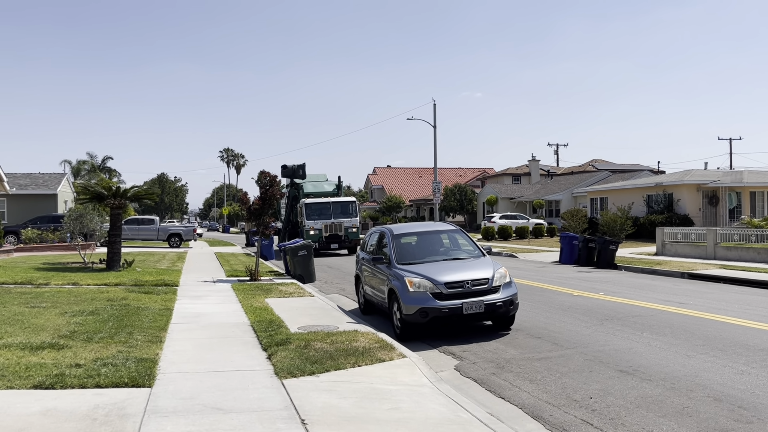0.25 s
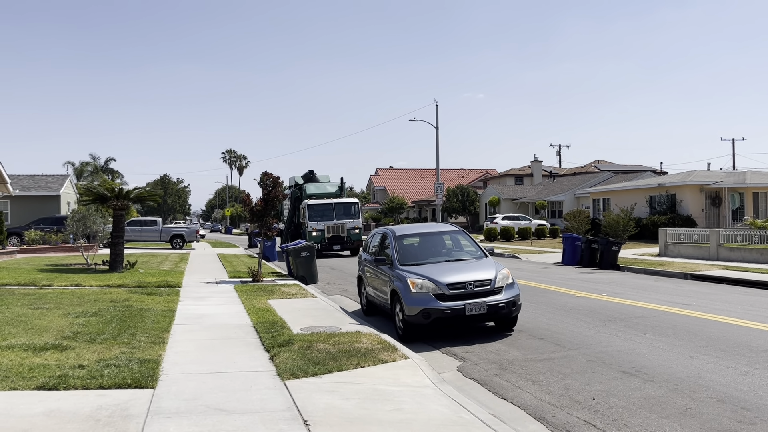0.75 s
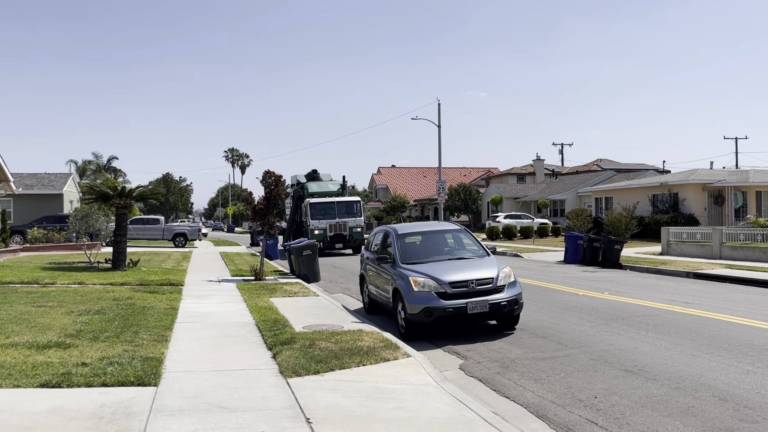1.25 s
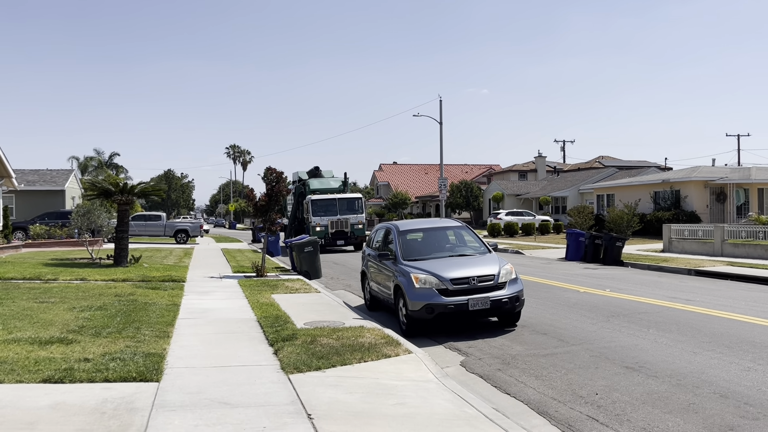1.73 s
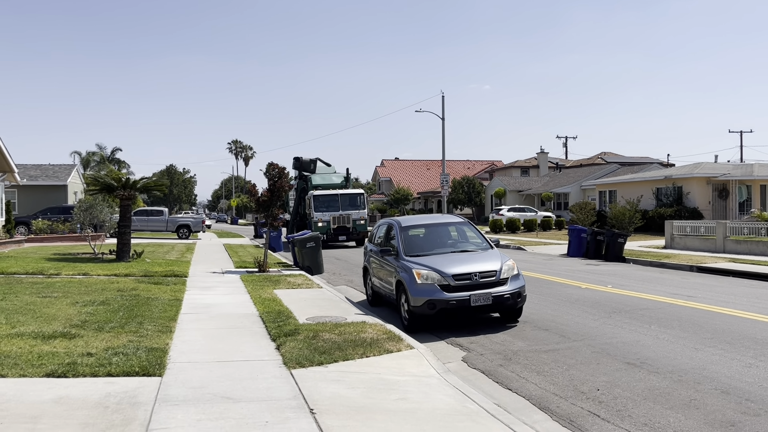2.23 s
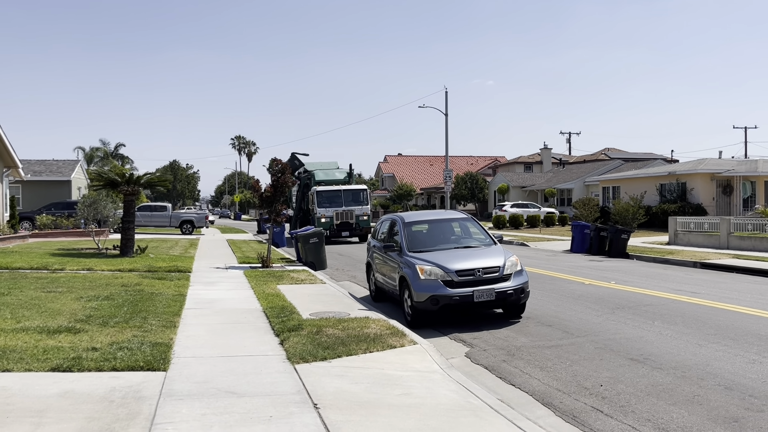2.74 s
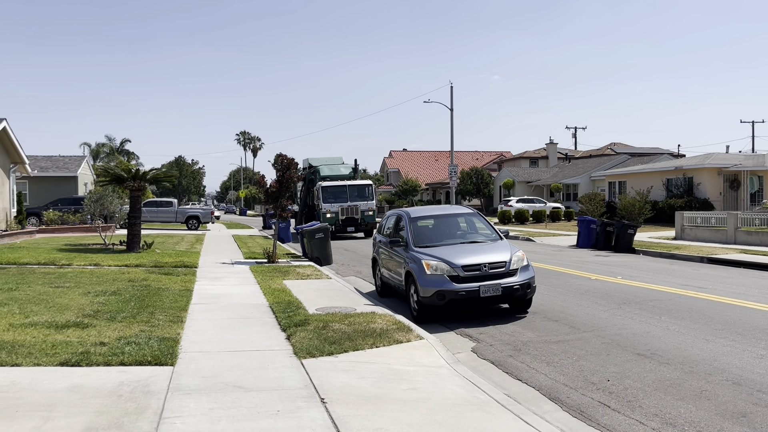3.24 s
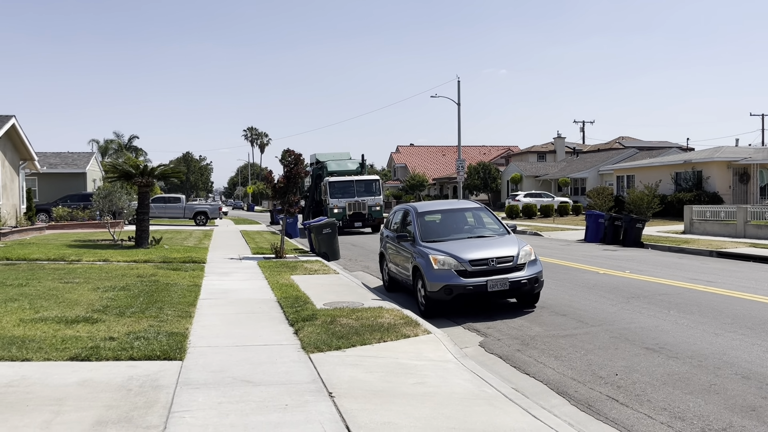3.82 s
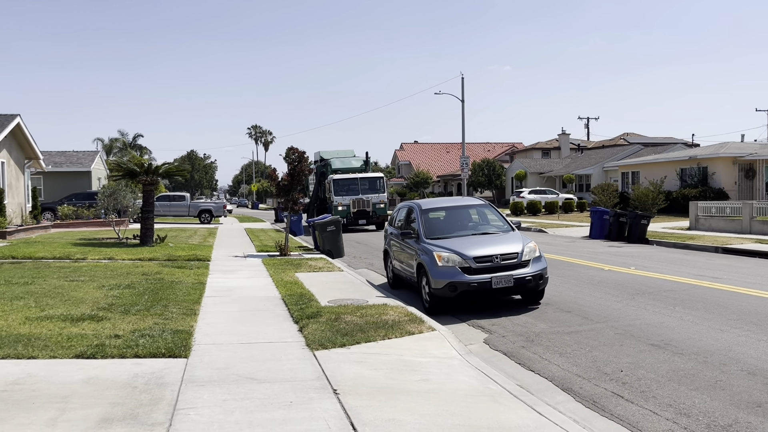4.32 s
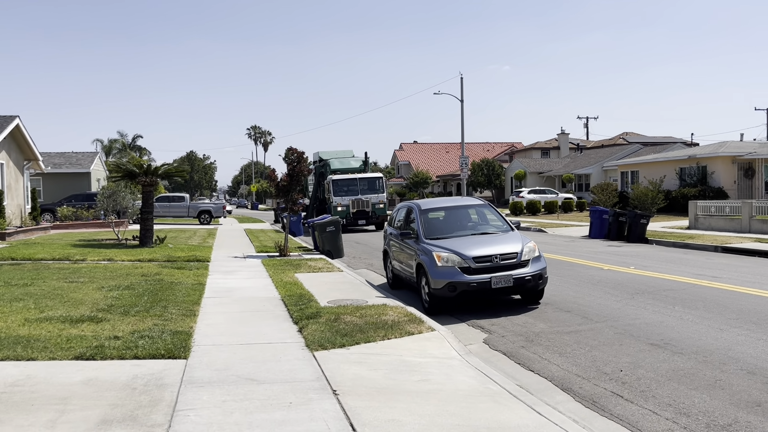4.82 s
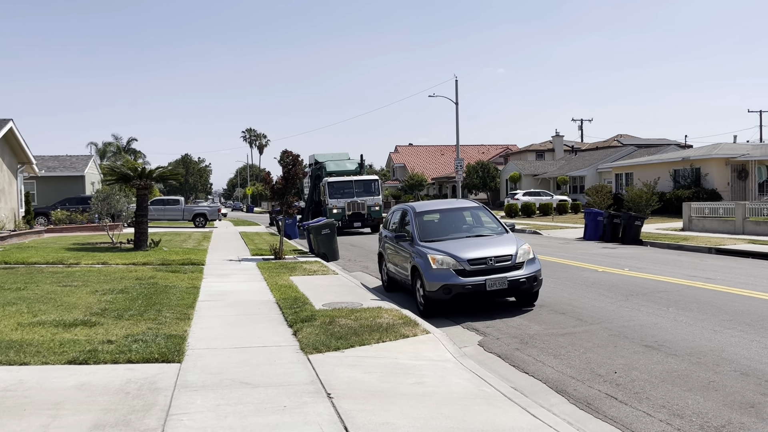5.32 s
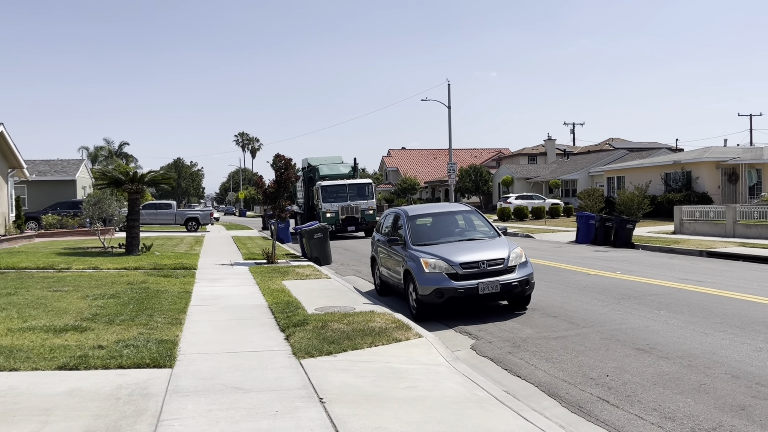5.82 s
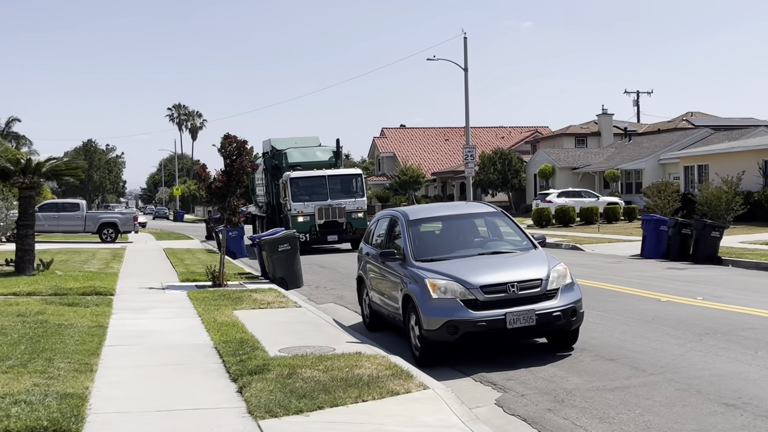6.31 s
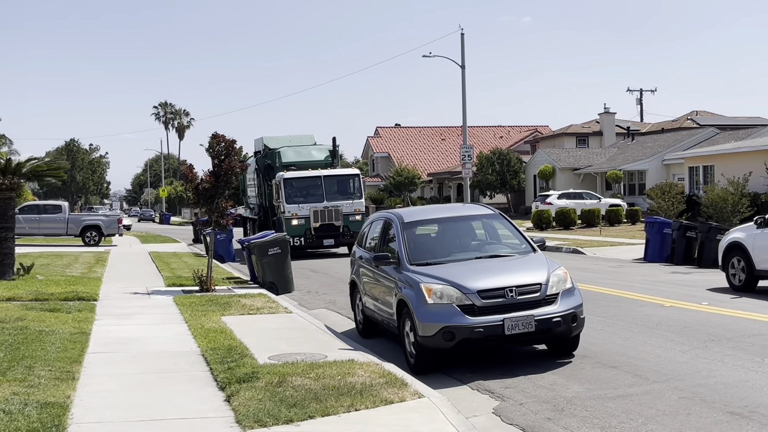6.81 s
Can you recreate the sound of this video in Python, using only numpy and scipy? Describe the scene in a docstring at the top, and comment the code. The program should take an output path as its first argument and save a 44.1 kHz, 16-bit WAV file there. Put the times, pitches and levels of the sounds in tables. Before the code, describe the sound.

Side-loading garbage truck bangs and rattles a cart on a suburban street, hisses air, thuds into motion, and grows closer among passing cars.

```python
"""A car's rough note climbs away over a truck engine that revs up, then blows burst from a shaken cart.
Down a suburban street a side-loading garbage truck empties the cart, lowers it and rolls on; a car nears.
Engines, gears and tyres are sums of unevenly pulsing sines; traffic, hydraulic oil and air are shaped noise.
Cracks and chattering contacts excite steel resonances, sines with fast decays make clangs and thuds,
and a noise tail whose middle pitches last longest echoes the bangs from house fronts."""
import sys
import numpy as np
from scipy import signal
from scipy.fft import rfft, irfft
from scipy.io import wavfile

SR = 44100
rng = np.random.default_rng(int(sys.argv[2]) if len(sys.argv) > 2 else 0)


def output_pcm(signal):
    """Save a mono or channel-first signal as 16-bit PCM at the path in sys.argv[1].

    Samples are clipped to [-1, 1] before scaling.
    """
    pcm = np.clip(np.atleast_2d(signal).T, -1, 1) * 32767
    wavfile.write(sys.argv[1], SR, np.round(pcm).astype(np.int16))


N = 311346
TIME, FREQ = np.arange(N) / SR, np.fft.rfftfreq(N, 1 / SR)  # s, Hz

# Steady noise of engines and tyres, nearer towards the end: start_s, rumble_db, roar_db, rattle_db
TRAFFIC = [(0, -37, -44.5, -49), (1.7, -30.5, -43, -56.5), (2.8, -34, -42.5, -42), (4.4, -32.5, -37, -46.5),
           (6.2, -30, -39, -45.5), (7.06, -27.5, -36, -46.5)]
# Truck body shudders as the cart is dumped, as it is set down, as the truck moves off and jolts on:
# peak_s, build_db_per_s (before layer steepness), rumble_db, roar_db, rattle_db
SHUDDERS = [(0.721, 32, -22.5, -30.5, -33.5), (3.78, 17, -27.5, -34.5, -31), (4.92, 51, -24.5, -34.5, -51),
            (6.62, 39, -24, -36, -56)]
# Settling is scaled by steepness too; roar and rattle come and go more steeply than the rumble
SETTLE_DB_PER_S, RUMBLE_STEEPNESS, LOOSE_STEEPNESS = 24, 0.53, 1.42
# Low rumble of engines and tyres: pitch_hz, relative level_db
RUMBLE_TONE = [(20, -41), (35, -6.5), (55, 8), (85, 6), (140, 3.5), (200, -2), (255, -3), (330, -13.5),
               (600, -25.5), (1500, -79.5)]
# Their mid roar: pitch_hz, relative level_db
ROAR_TONE = [(150, -12.5), (350, 4), (550, 5), (800, -0.5), (1300, -3), (1900, -8), (2700, -12.5),
             (3800, -15), (5200, -20), (6300, -23), (8500, -24), (13000, -33), (16000, -44)]

# Drone of the approaching car: start_s, pitch_hz (base of its partials), level_db
DRONE = [(3.4, 66.4, -47), (4.6, 67.25, -31.5), (5.3, 70.03, -36), (6.5, 67.1, -30.5), (7.06, 73, -71)]
# Hum of its tyres: start_s, pitch_hz, level_db
TYRES = [(5.6, 172, -54), (6.25, 178, -34), (6.7, 203, -36.5), (7.06, 238, -31)]
# Orders of the car pulling away, the second being its firing rate: multiple of crank rate, relative level_db
CAR_ORDERS = [(1, -7), (2, 2.5), (3, -17), (4, -13.5), (5, -20), (6, -22.5), (7, -28.5), (8, -28),
              (9, -30.5)]
# Resonances of its exhaust: pitch_hz, width_hz, lift_db
CAR_PIPE = [(96.8, 20, 12), (127.1, 4.3, 12), (192.3, 18, 15), (231, 12, 9), (253.7, 14.5, 9),
            (349, 25, 7.5), (448, 83, 12)]
CAR_FLUTTER = .24  # unevenness of its firings, rms share
CAR_START_HZ, CAR_TOP_HZ, CAR_CLIMB_S = 55.06, 145.95, .6  # firing rate and time constant of its climb
CAR_DB, CAR_RECEDE_DB_PER_S = -20.5, 11
CAR_OPEN_S, CAR_OPEN_DB_PER_S = .3, 17  # its note swells as the throttle opens
CAR_LIFT_S, CAR_LIFT_DB_PER_S = 1.12, 88  # then it drops away fast

# Truck engine speed: start_s, four-stroke cycle rate_hz
CYCLE = [(0, 8.2), (.6, 13.3), (.9, 15.6), (1.1, 16.4), (1.8, 16.7), (2.6, 18.6), (3.1, 20.5), (3.3, 19),
         (4.4, 19), (5.5, 20.3), (5.9, 19.8), (6.15, 18.9), (6.5, 19.7), (7.06, 20.6)]
# Weaker engine orders: multiple of cycle rate, relative level_db
ORDERS_DB = [(4, -33.5), (6, -28.5), (7, -37), (8, -33.5), (9, -34.5), (10, -46), (11, -42.5), (12, -44.5),
             (13, -40.5), (15, -38.5), (17, -47.5), (25, -48.5), (30, -48.5)]
# The exhaust pipe booms when an order crosses a resonance: pitch_hz, width_hz, lift_db
PIPE = [(46.8, 22.2, 15), (97.4, 14.3, 14.5)]
# Throttle held open to work the arm, then to drive on: start_s, end_s, level_db
THROTTLE = [(.7, 2.9, -1), (3.15, 3.56, -3.5), (4.55, 4.95, -11.5), (5.08, 5.92, 1)]
COAST_DB, THROTTLE_DB_PER_S = -16.5, 85
THIRD_DB, FIFTH_DB, ORDERS_LOAD_DB = -40, -36.5, -8.5  # at 0 dB throttle, before resonance and nearing
THIRD_FOLLOW, ORDERS_FOLLOW = 0.11, 0.29  # dB per dB of throttle
NEARING_DB_PER_S = 0.94  # the weaker orders come forward over time
ORDERS_FLUTTER = .2  # unevenness of the truck's firings, rms share
# Diesel clatter: pitch_hz, relative level_db
CLATTER_TONE = [(300, -2), (600, 3.5), (950, 6.5), (1400, -11), (2300, -0.5), (3300, -20), (8000, -38.5)]
# dB against the steady roar at 0 dB throttle; dB per dB of throttle; share of a firing
CLATTER_DB, CLATTER_FOLLOW, CLATTER_DECAY_TURNS = -5, .15, .25
# Gear whine as the truck moves off: start_s, shaft pitch_hz, level_db
GEARS = [(4.8, 106, -75), (5.2, 115.3, -40), (5.65, 123, -49), (6, 132, -42), (6.4, 126, -65)]

# Strokes of the hydraulic arm: start_s, end_s, oil hiss level_db
STROKES = [(.9, 1.55, -45.5), (2.05, 2.65, -43.5), (3.3, 3.6, -45.5)]
OIL_IDLE_DB, VALVE_DB_PER_S = -53.5, 16.5
# Oil rushing through the arm's valves: pitch_hz, relative level_db
OIL_TONE = [(800, -30.5), (2400, 4.5), (3400, 0), (4300, 5.5), (5200, 3), (6300, -6.5), (9000, -38),
            (15000, -50)]
# Faint squeaks as the truck moves off: centre_s, level_db, pitch_hz
SQUEAKS = [(4.807, -50, 8250), (4.873, -52, 8550), (5.04, -52, 8323), (5.103, -48, 8500),
           (5.146, -49, 8400), (5.279, -54, 8400)]
# Tint of the loose taps over the ring of the steel: pitch_hz, lift_db
TAP_TINT = [(150, -33.0), (700, 3.0), (2500, 5.5), (7000, -10.5)]
# Air valves venting: start_s, level_db, length_s (until it starts to fade), brightness_db_per_octave
PUFFS = [(1.046, -43, 0.097, 6), (1.422, -48.5, 0.0065, 0), (2.406, -33, 0.015, -2),
         (2.733, -36.5, 0.0099, -1.5), (3.269, -35, 0.04, -5), (4.992, -40.5, 0.05, -4),
         (5.606, -42, 0.086, 0), (6.437, -26.5, 0.083, -6.5)]
# Colour of the jet before that brightness: pitch_hz, relative level_db
PUFF_TONE = [(400, -12.5), (1500, -12), (3000, 12.5), (8000, 7), (12500, -1.5), (16000, -17)]

# Hollow knocks of cart and hopper: start_s, level_db, pitch_hz, t60_s, share of neighbouring modes
THUDS = [(.659, -9.5, 204, 0.074, 0.46), (.719, -1, 690, 0.037, 0.16), (.737, -8.5, 103.7, .18, 0.24),
         (3.607, -14, 947, .035, .4), (3.628, -17, 634, 0.22, 0.51), (4.775, -12.5, 209, 0.12, 0.72),
         (4.833, -6, 114.4, .08, 0.23)]
JOLT_S = 4.797  # start_s: the truck body thuds as the drive takes up
# Modes of that thud: level_db, pitch_hz, t60_s, share of neighbouring modes
BODY = [(-11.5, 86, 0.2, 0.14), (-12, 170, 0.17, 0.33), (-7.5, 255, 0.11, 0.15), (-13.5, 325, .11, 0.41)]
# Panels and bars left singing by a hard blow: start_s, level_db, pitch_hz, t60_s
CLANGS = [(.688, -27, 1382, 0.11), (1.869, -36.5, 685, 0.11), (2.415, -47, 3090, 0.2),
          (3.116, -35, 865, 0.26), (3.116, -35.5, 1090, 0.28), (3.123, -33, 2340, 0.099),
          (3.275, -30.5, 950, 0.14), (3.275, -35, 3120, 0.24), (3.459, -30.5, 1430, 0.11),
          (3.628, -22, 1379, .17), (3.628, -28, 880, 0.12), (3.834, -29, 2485, 0.28),
          (3.834, -34, 4160, .16), (6.451, -27, 1485, 0.16)]
CLANG_SPLIT_HZ, CLANG_SIDE_DB = 38.8, 1  # spread and strength of modes beating with each ring
# Bright snaps of hard steel-on-steel contacts: start_s, level_db
SNAPS = [(.638, -33), (.717, -49), (3.114, -37.5), (3.275, -35), (3.625, -31), (3.836, -17.5)]
SNAP_T60_S, SNAP_BRIGHT_DB = 0.041, 3.5  # brightness in dB per octave
# Blows of arm and cart: start_s, level_db, body_db, treble_db, rise_s, t60_s, strongest ring pitch_hz
BANGS = [(.533, -25, -2, -9, 0.0008, 0.19, 915), (.553, -28, 4, 1.5, 0.0016, 0.22, 1490),
         (.632, -20, 2.5, -0.5, 0.006, 0.32, 1490), (.644, -18, 3, -6, .0015, 0.12, 860),
         (.659, -21, 9, 2, 0.0014, 0.1, 460), (.686, -25, 4, -1, .002, 0.16, 1420),
         (.702, -26.5, 4, -4, .002, .16, 1400), (.716, -20, -0.5, -3, 0.0009, 0.11, 1420),
         (.753, -25.5, 0, -4, .002, .24, 3150), (.773, -33, 16, -8, .0015, 0.17, 1300),
         (.821, -27.5, -5.5, -10.5, 0.00089, 0.15, 1560), (1.825, -35, 1, -2, 0.0028, 0.21, 1470),
         (1.869, -32.5, 3, -2, 0.0043, 0.15, 690), (2.413, -28.5, -6, -8, 0.0037, 0.23, 2920),
         (2.609, -34, -6, -17, .001, .16, 2403), (2.735, -35, 7, -7, 0.0037, 0.27, 1560),
         (2.83, -39, -12, -16, 0.0071, 0.23, 1200), (3.053, -32.5, -20, -15, .001, 0.088, 2740),
         (3.114, -22.5, -5.5, -10, 0.00036, 0.052, 2850), (3.122, -27, -6, -8.5, 0.00089, 0.25, 2020),
         (3.273, -33, -12, 5, 0.0011, 0.14, 3180), (3.415, -25.5, 5.5, 1.5, 0.00093, 0.2, 845),
         (3.44, -26, 1, -4, 0.00066, 0.15, 1100), (3.458, -26, 5, -0.5, 0.0025, 0.36, 1420),
         (3.607, -25, 6, -10, .0008, 0.056, 880), (3.628, -19, 4, -3, 0.00072, 0.2, 2060),
         (3.648, -27.5, -1, -2.5, 0.0035, 0.44, 885), (3.748, -26.5, -1, -14, 0.0024, 0.13, 1340),
         (3.826, -18, -17, 1, 0.0031, 0.25, 4420), (3.89, -24, -2, -8, 0.0057, 0.39, 1420),
         (4.76, -30, -5, -28, .005, .25, 1747), (4.778, -29.5, 8, -10, 0.0034, 0.21, 870),
         (4.797, -29, -1, -12, .002, .25, 490), (4.918, -29, -7.5, -8, 0.0091, 0.32, 1350),
         (5.008, -30.5, 6, 3, .003, 0.2, 1550), (6.441, -25.5, 0.5, -8.5, 0.0067, .35, 3650),
         (6.459, -24.5, 7, -15, 0.0033, .09, 1440), (6.488, -33, 2, -9, 0.0017, 0.29, 440),
         (6.668, -33, -5, -14, 0.0037, 0.39, 3670)]
# Broad ring of the steel: pitch_hz, relative level_db
BANG_TONE = [(60, -28.5), (200, 4.5), (650, 1), (1400, -1.5), (1900, -8), (2800, -5.5), (4000, -13.5),
             (5300, -16), (6200, -14.5), (8300, -17.5), (13000, -28.5), (16000, -44.5)]
# Strong modes of the steel arm and hopper: pitch_hz, width_hz, lift_db over the broad ring
STEEL = [(627, 41, -1), (903, 13, -8.5), (1330, 120, 1), (2530, 67, 2.5), (2740, 77, -1), (3046, 31, 6),
         (4020, 160, 3), (5120, 350, 6.5), (6820, 150, 4.5)]
CHATTER_DB, CHATTER_HZ = 3.5, 450  # depth and speed of the contacts after a blow
CRACK_DB, CRACK_RISE_S = 23, .002  # first contact; blows that rise more slowly barely crack

# Decay of the street echo: pitch_hz, t60_s
STREET_T60 = [(100, 0.43), (1000, 1), (4000, 0.89), (12000, 0.51)]
# How alike noise is left and right: pitch_hz, coherence (0 to 1)
LIKENESS = [(100, 1), (300, .99), (1000, 0.83), (2200, 0.79), (4500, 0.56), (6000, 0.85), (10000, 1)]
# Level of the left channel over the right: pitch_hz, level_db
LEAN = [(100, -0.6), (280, -0.7), (550, 0.3), (1100, 3.8), (2200, 0.4), (4500, -1), (9000, 0.3)]
# Phase between the left and right channels, nearly flat at the top: pitch_hz, left lead in radians
PORT_PHASE = [(0, 0), (150, -.06), (450, -.3), (1400, -.35), (1900, .35), (2400, 1.4), (3100, 1.4),
              (3800, .7), (5000, .9), (5950, 3.14), (7700, 6.1), (8300, 6.5), (9800, 9.1), (10800, 9.8),
              (12000, 12.4), (13000, 12.8), (14200, 15.5), (16000, 15.8)]
EDGE_HZ = 15800  # band limit


def amp(db):
    """Decibels to gain."""
    return 10 ** (np.asarray(db) / 20)


def unit(x):
    """Scales to rms 1."""
    return x / np.sqrt(np.mean(x ** 2) + 1e-20)


def curve(rows, axis=1):
    """One column of a time table at every sample."""
    rows = np.array(rows)
    return np.interp(TIME, rows[:, 0], rows[:, axis])


def read(points, hz):
    """A spectrum table on a log-frequency axis."""
    f, value = np.transpose(points)
    return np.interp(np.log(hz + 1), np.log(f + 1), value)


def add(mix, s, sound):
    """Mixes a sound into both channels at time s."""
    part = mix[:, max(round(s * SR), 0):][:, :sound.shape[1]]
    part += sound[:, :part.shape[1]]


def waver(rate):
    """Random wandering of rms 1, mostly below the given rate in Hz."""
    return unit(irfft(rfft(rng.standard_normal(N)) / (1 + (FREQ / rate) ** 4), N))


def noise(shape_db, hz):
    """Stereo noise of a given spectrum, partly alike in both channels."""
    a, b = rfft(rng.standard_normal((2, 2 * len(hz) - 2)))
    same = np.clip(read(LIKENESS, hz), 0, 1)
    right = same * a + np.sqrt(1 - same ** 2) * b
    return unit(irfft(np.array([a, right]) * amp(shape_db)))


def order_tone(turns, multiple, flutter):
    """One partial of a turning machine, a sine of uneven strength."""
    sine = np.sqrt(2) * np.sin(2 * np.pi * (multiple * turns + rng.random()))
    return sine * (1 + flutter * waver(22.0))


def resonances(rows, hz):
    """Lift in dB from a set of resonances."""
    return sum(db / (1 + (2 * (hz - f) / width) ** 2) for f, width, db in rows)


def held(rows, rest_db, db_per_s):
    """Level in dB of a control that opens, holds and closes at one speed."""
    gains = [amp(db - db_per_s * abs(TIME - np.clip(TIME, start, end))) for start, end, db in rows]
    return 20 * np.log10(np.maximum(np.max(gains, 0), amp(rest_db)))


def throttle_db():
    """Throttle of the truck in dB, resting at its coasting level."""
    return held(THROTTLE, COAST_DB, THROTTLE_DB_PER_S)


def shaken(steepness, axis):
    """Gain of one traffic layer, with the shudders of the truck body building up and settling on top."""
    power = amp(curve(TRAFFIC, axis=axis)) ** 2
    for s, build, *levels in SHUDDERS:
        away_db = np.maximum(build * (s - TIME), SETTLE_DB_PER_S * (TIME - s))
        power = power + amp(levels[axis - 1] - steepness * away_db) ** 2
    return np.sqrt(power)


def steel(hz):
    """Spectrum in dB of the arm and hopper: a broad ring with a few strong modes."""
    return read(BANG_TONE, hz) + resonances(STEEL, hz)


def spot(hz, count=24):
    """Each place that is struck favours other modes: a random ripple of rms 1 over frequency."""
    delay, start = rng.random((2, count, 1))
    return unit(np.cos(2 * np.pi * (hz * (.001 + .007 * delay) + start)).sum(0))


def ringing(drive, shape_db):
    """Passes a stereo drive through resonances that ring on after each contact."""
    log_gain = np.log(unit(amp(shape_db)))
    circle = np.concatenate([log_gain, log_gain[-2:0:-1]])
    # Minimum phase: the ring starts with the contact and never before it
    response = np.exp(np.conj(signal.hilbert(circle)))[:len(log_gain)]
    return irfft(rfft(drive) * response, drive.shape[1])


def street(x):
    """Scattered echoes from house fronts, bass and top treble dying sooner than the middle."""
    hz = np.fft.rfftfreq(SR, 1 / SR)
    hz, t, z = signal.stft(noise(np.zeros(len(hz)), hz), SR, nperseg=256)
    decay = amp(-60 * t / read(STREET_T60, hz)[:, None])
    onset = np.minimum(t / 0.0077, 1)
    tail = signal.istft(z * decay * onset, SR, nperseg=256)[1]
    return signal.fftconvolve(x, tail / np.linalg.norm(tail[0]), axes=1)[:, :N]


def rumble():
    """Low noise of engines and tyres, swelling with each shudder of the truck body."""
    return noise(read(RUMBLE_TONE, FREQ), FREQ) * shaken(RUMBLE_STEEPNESS, axis=1)


def roar(turns):
    """Mid noise of engines and tyres, wavering and throbbing with the six cylinders."""
    throb = 1 + 0.041 * np.cos(2 * np.pi * 6 * turns)
    return noise(read(ROAR_TONE, FREQ), FREQ) * shaken(LOOSE_STEEPNESS, axis=2) * amp(0.83 * waver(24)) * throb


def approaching_car():
    """Two droning partials and the hum of tyres, each an uneven sine on its own pitch curve."""
    turns = np.cumsum(curve(DRONE)) / SR
    drone = order_tone(turns, 0.99, flutter=0.12) + amp(1.0) * order_tone(turns, 2, flutter=0.31)
    tyre_turns = np.cumsum(curve(TYRES) * (1 + .012 * waver(25))) / SR
    tyres = order_tone(tyre_turns, 1, flutter=.2)
    return amp(curve(DRONE, axis=2)) * drone + amp(curve(TYRES, axis=2)) * tyres


def leaving_car():
    """A rough exhaust note climbs through its pipe resonances towards a top rate while it recedes."""
    firing_hz = CAR_TOP_HZ + (CAR_START_HZ - CAR_TOP_HZ) * np.exp(-TIME / CAR_CLIMB_S)
    crank_hz = firing_hz / 2
    level = CAR_DB - CAR_RECEDE_DB_PER_S * TIME
    level -= CAR_LIFT_DB_PER_S * np.maximum(TIME - CAR_LIFT_S, 0)
    level -= CAR_OPEN_DB_PER_S * np.maximum(CAR_OPEN_S - TIME, 0)
    turns = np.cumsum(crank_hz * (1 + .006 * waver(13.5))) / SR
    note = 0
    for k, db in CAR_ORDERS:
        gain = amp(db + resonances(CAR_PIPE, round(k) * crank_hz))
        note = note + gain * order_tone(turns, round(k), flutter=CAR_FLUTTER)
    return amp(level) * note


def truck_engine(turns):
    """Two exhaust orders boom in the pipe; they and the weaker ones grow with the throttle."""
    third, fifth = order_tone(turns, 3, flutter=.15), order_tone(turns, 5, flutter=.1)
    third_hz, fifth_hz = 3 * curve(CYCLE), 5 * curve(CYCLE)
    throttle = throttle_db()
    boom = amp(THIRD_DB + THIRD_FOLLOW * throttle + resonances(PIPE, third_hz)) * third
    boom += amp(FIFTH_DB + throttle + resonances(PIPE, fifth_hz)) * fifth
    weaker = sum(amp(db) * order_tone(turns, round(k), flutter=ORDERS_FLUTTER) for k, db in ORDERS_DB)
    return boom + amp(ORDERS_LOAD_DB + ORDERS_FOLLOW * throttle + NEARING_DB_PER_S * TIME) * weaker


def clatter(turns, count=6):
    """The six cylinders knock with unequal strength, harder as the throttle opens."""
    firings = count * turns
    cylinder = amp(1.4 * rng.standard_normal(count))[firings.astype(int) % count]
    bursts = unit(cylinder * np.exp(-(firings % 1) / CLATTER_DECAY_TURNS))
    level = CLATTER_DB + curve(TRAFFIC, axis=2) + CLATTER_FOLLOW * throttle_db()
    return amp(level) * bursts * noise(read(CLATTER_TONE, FREQ), FREQ)


def gears():
    """The drive line whines on two partials that climb as the truck gathers speed, then sag as they fade."""
    turns = np.cumsum(curve(GEARS)) / SR
    whine = order_tone(turns, 2, flutter=.25) + .6 * order_tone(turns, 3, flutter=.25)
    return amp(curve(GEARS, axis=2)) * whine


def hydraulic_oil():
    """Oil hisses through the valves as shaped noise, louder on each stroke of the arm."""
    level = held(STROKES, OIL_IDLE_DB, VALVE_DB_PER_S) + 0.98 * waver(25)
    return noise(read(OIL_TONE, FREQ), FREQ) * amp(level)


def squeaks(size=4096):
    """Dry metal slips and chirps briefly on one high resonance."""
    out, hz = np.zeros((2, N)), np.fft.rfftfreq(size, 1 / SR)
    swell = np.exp(-((np.arange(size) - size / 2) / SR / 0.0075) ** 2)
    for s, db, pitch in SQUEAKS:
        chirp = noise(-20 * np.log10(1 + ((hz - pitch) / 220) ** 2), hz)
        add(out, s - size / 2 / SR, amp(db) * swell * chirp)
    return out


def rattle(rate=45, count=20, size=4096):
    """Loose parts tap at random (rate per s) on different spots of the steel."""
    out, t, hz = np.zeros((2, N)), np.arange(size) / SR, np.fft.rfftfreq(size, 1 / SR)
    tint_db = read(TAP_TINT, hz)
    for _ in range(count):
        tap = noise(steel(hz) + tint_db + 5 * spot(hz), hz) * amp(-60 * t / 0.19)
        chance, strength = rng.random((2, N))
        hits = (chance < rate / count / SR) * amp(10 * strength)
        out += signal.oaconvolve(hits[None], tap, axes=1)[:, :N]
    return unit(out) * shaken(LOOSE_STEEPNESS, axis=3)


def puffs(size=16384):
    """A valve opens, air hisses out, and the jet dies away."""
    out, t, hz = np.zeros((2, N)), np.arange(size) / SR, np.fft.rfftfreq(size, 1 / SR)
    for s, db, length, bright_db in PUFFS:
        jet = noise(read(PUFF_TONE, hz) + bright_db * np.log2(hz + 1), hz)
        opening = np.minimum(t / (0.089 * length), 1)
        fade = np.exp(-np.maximum(t - length, 0) / 0.024)
        add(out, s, amp(db) * jet * opening * fade)
    return out


def thuds(size=16384, count=6):
    """A panel mode and its neighbours swell and die quickly."""
    out, t = np.zeros((2, N)), np.arange(size) / SR
    for s, db, hz, t60, share in THUDS + [(JOLT_S, *mode) for mode in BODY]:
        modes = hz * np.linspace(.6, 1.4, count) * (1 + 0.024 * rng.standard_normal(count))
        cluster = np.sin(2 * np.pi * (modes[:, None] * t + rng.random((count, 1)))).sum(0) / np.sqrt(count)
        ring = (1 - share / 2) * np.sin(2 * np.pi * hz * t) + share * cluster
        add(out, s, (amp(db - 60 * t / t60) * ring * (1 - np.exp(-t / 0.0018)))[None])
    return out


def clangs(size=16384, count=4):
    """A struck part rings on one mode, beating against its close neighbours."""
    out, t = np.zeros((2, N)), np.arange(size) / SR
    for s, db, hz, t60 in CLANGS:
        near_hz = hz + CLANG_SPLIT_HZ * rng.standard_normal((count, 1))
        near = np.sin(2 * np.pi * (near_hz * t + rng.random((count, 1)))).sum(0)
        ring = unit(np.sin(2 * np.pi * hz * t) + amp(CLANG_SIDE_DB) * near)
        add(out, s, (amp(db - 60 * t / t60) * ring * (1 - np.exp(-t / 0.00085)))[None])
    return out


def snaps(size=4096):
    """A hard contact excites the steel for a moment: a short noise burst tilted to the treble."""
    out, t, hz = np.zeros((2, N)), np.arange(size) / SR, np.fft.rfftfreq(size, 1 / SR)
    for s, db in SNAPS:
        burst = noise(steel(hz) + SNAP_BRIGHT_DB * np.log2(hz + 1), hz)
        add(out, s, amp(db - 60 * t / SNAP_T60_S) * burst)
    return out


def bangs(size=16384):
    """Each blow cracks, then chatters in quick uneven contacts that ring the modes of the steel."""
    out, t, hz = np.zeros((2, N)), np.arange(size) / SR, np.fft.rfftfreq(size, 1 / SR)
    chatter = unit(amp(CHATTER_DB * waver(CHATTER_HZ)))
    for s, db, body_db, treble_db, rise, t60, ring_hz in BANGS:
        colour_db = read([(900, body_db), (2300, 0), (7000, treble_db)], hz)
        colour_db += 7 / (1 + ((hz / ring_hz - 1) / .06) ** 2)  # strongest ring
        colour_db += 1.9 * spot(hz)
        fall = (amp(-60 * t / t60) + 0.28 * np.exp(-t / 0.003)) * (1 - np.exp(-t / rise))
        contacts = noise(np.zeros(len(hz)), hz) * fall * chatter[round(s * SR):][:size]
        contacts[:, round(rise * SR)] += amp(CRACK_DB) * np.exp(-rise / CRACK_RISE_S)
        add(out, s, amp(db) * ringing(contacts, steel(hz) + colour_db))
    return out


def scene():
    """Engines and traffic under the working arm and its echoes."""
    turns = np.cumsum(curve(CYCLE) * (1 + .001 * waver(5))) / SR  # four-stroke cycles so far
    traffic = rumble() + roar(turns) + approaching_car() + leaving_car()
    truck = truck_engine(turns) + clatter(turns) + gears() + hydraulic_oil()
    arm = squeaks() + rattle() + puffs() + clangs() + snaps() + bangs()
    knocks = thuds()
    echoes = street(amp(-11.0) * arm + amp(-17.0) * knocks)
    return traffic + truck + arm + knocks + echoes


def record(dry):
    """Left and right channels differ in level and phase; a low cut and the band limit follow."""
    hz = np.fft.rfftfreq(2 * N, 1 / SR)
    # Half of each difference goes to the left channel, its inverse to the right
    phase = np.interp(hz, *np.transpose(PORT_PHASE)) / 2
    left = amp(read(LEAN, hz) / 2) * np.exp(1j * phase)
    low_cut = 1 - 1 / (1 + (hz / 32) ** 8)
    heard = irfft(rfft(dry, 2 * N) * np.array([left, 1 / left]) * low_cut)[:, :N]
    band_limit = signal.firwin(511, EDGE_HZ, window=("kaiser", 9), fs=SR)
    return signal.oaconvolve(heard, band_limit[None], "same")


dry = scene()
out = record(dry)
output_pcm(out)
```